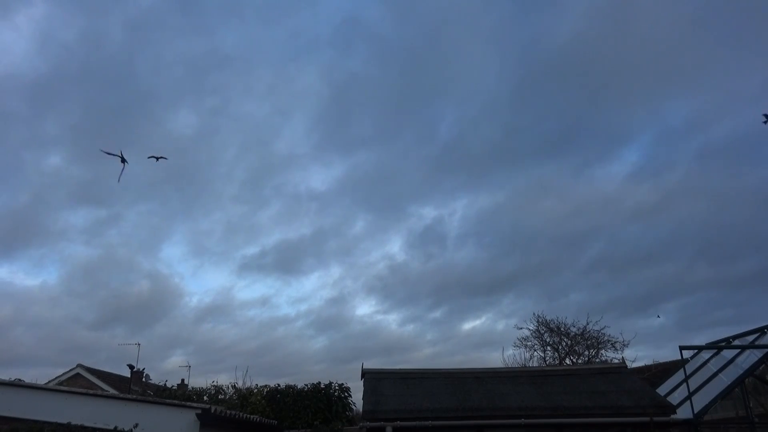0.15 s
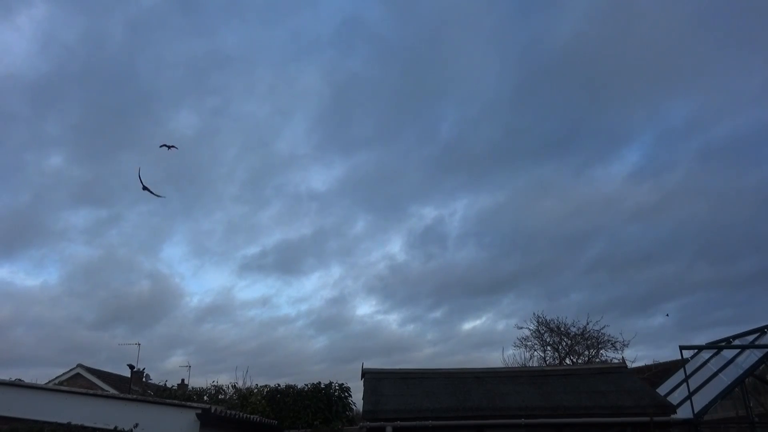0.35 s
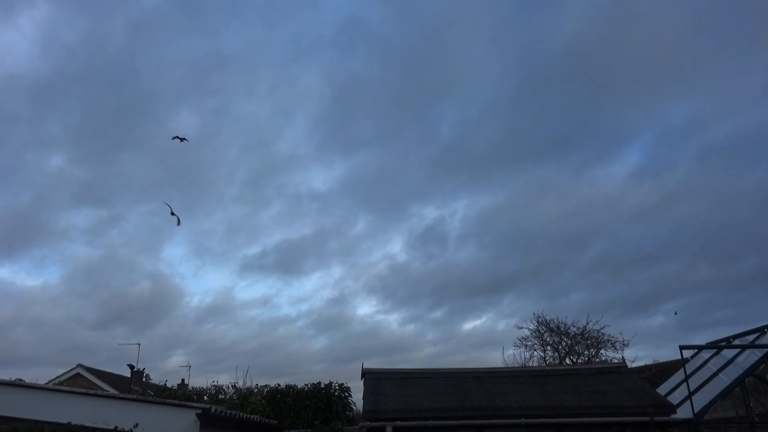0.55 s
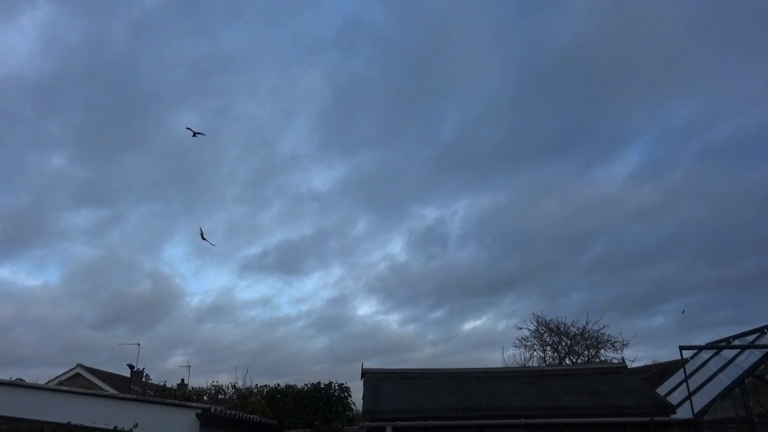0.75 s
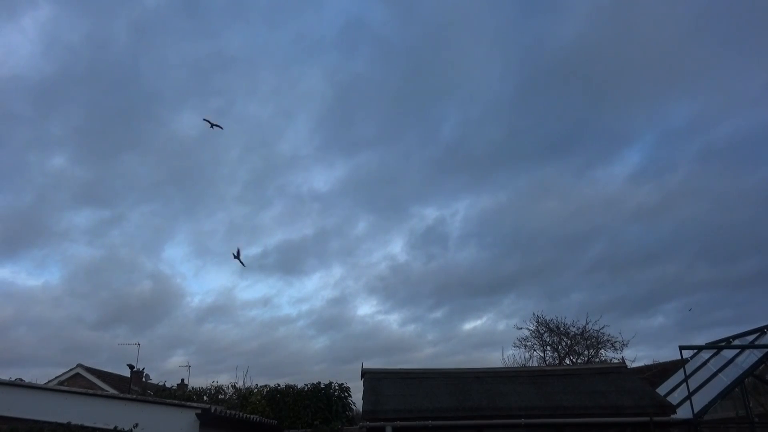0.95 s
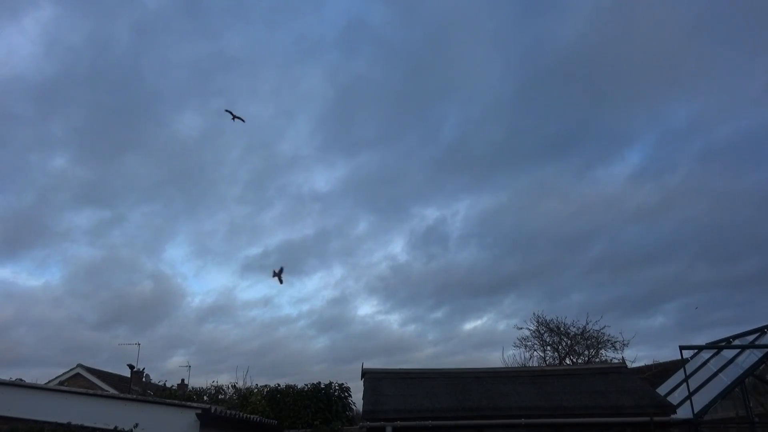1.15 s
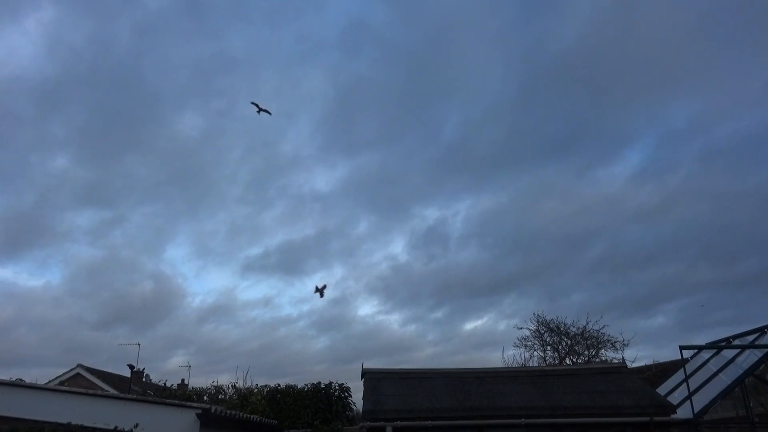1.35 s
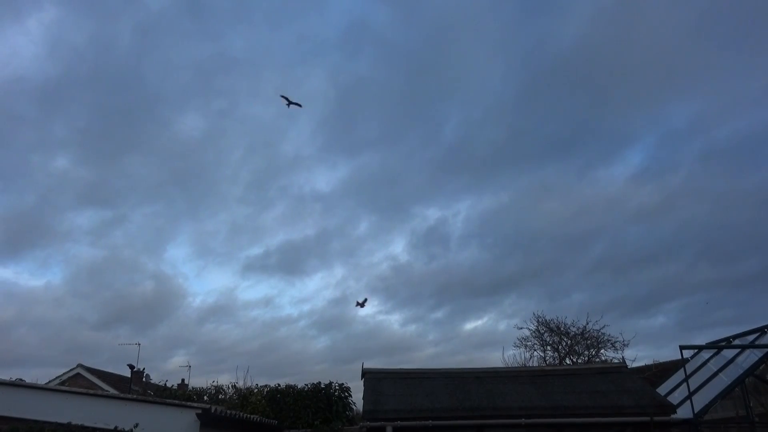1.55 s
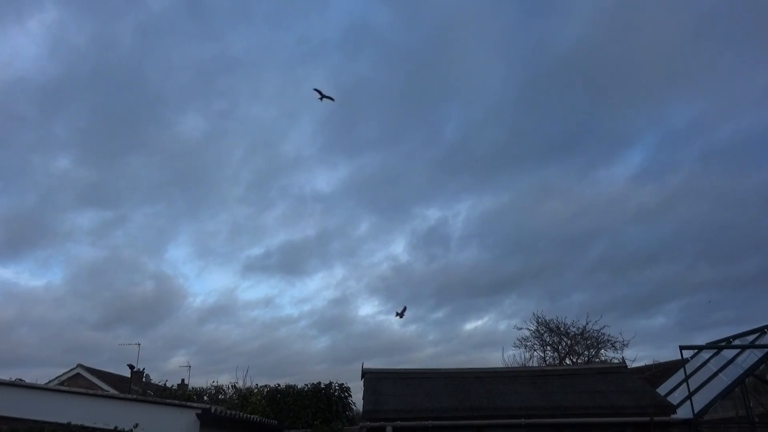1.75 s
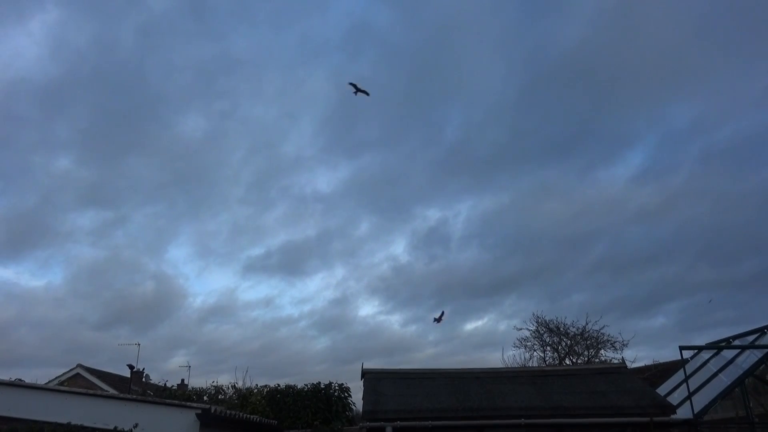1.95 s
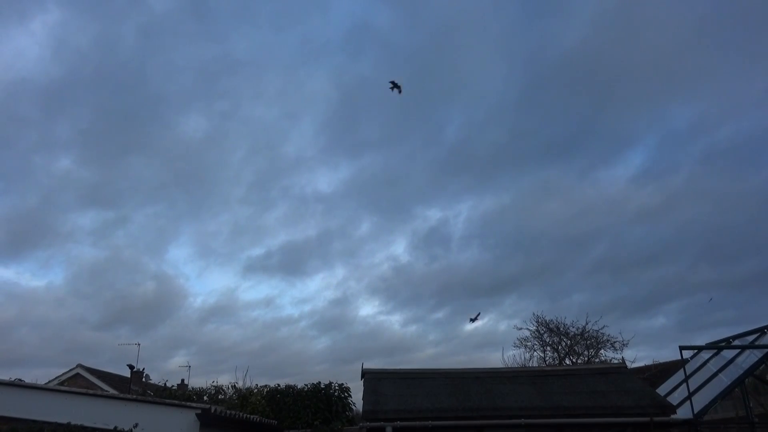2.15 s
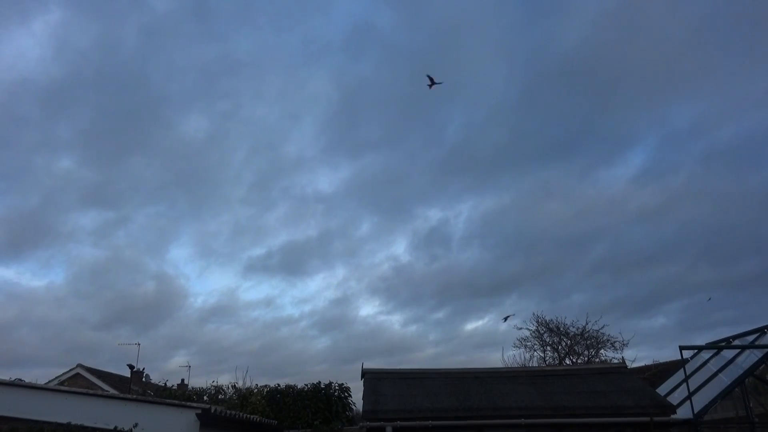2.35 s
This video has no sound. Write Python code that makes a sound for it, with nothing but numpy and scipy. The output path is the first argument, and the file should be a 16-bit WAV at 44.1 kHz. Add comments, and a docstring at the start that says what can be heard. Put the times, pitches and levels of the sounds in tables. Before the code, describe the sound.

Bird of prey whistles, long and thin, then slurs quickly up and down amid buffeting wind.

```python
"""A distant road hums and hisses softly, then a kite calls over gardens: a long thin whistle that breaks upward,
followed by quick rising and falling slurs. The voice is a wavering sine plus its octave, flipping between
a low, slightly reedy register and a pure high one; houses and gardens send back a faint echo.
Faint bird chips and short rustles are gliding raspy bands. Wind buffets the microphone as deep noise on gust curves."""
import sys
import numpy as np
from scipy import signal
from scipy.fft import rfft, irfft, next_fast_len
from scipy.io import wavfile
from scipy.ndimage import uniform_filter1d, map_coordinates

SR = 44100
rng = np.random.default_rng(int(sys.argv[2]) if len(sys.argv) > 2 else 0)


def file_out(sig):
    """Save sig as 16-bit WAV at sys.argv[1]."""
    # one column per channel
    cols = np.atleast_2d(sig).T
    # limit, then scale
    lim = np.clip(cols, -1, 1)
    pcm = np.round(lim * 32767).astype(np.int16)
    wavfile.write(sys.argv[1], SR, pcm)


N = 105840  # samples, 2.4 s

# Kite, one list per note in each register: t/s, pitch f/Hz, level before trim and flutter/dB
LOW_NOTES = [
    [(.2, 2310, -81), (.216, 2446, -66), (.264, 2706, -61.5), (.285, 2850, -68)],
    [(.332, 2856, -64), (.35, 2675, -60), (.43, 2520, -59.5), (.5, 2512, -65), (.595, 2408, -67.5),
     (.64, 2410, -72), (.725, 2485, -62.5), (.748, 2455, -58), (.778, 2465, -59), (.793, 2630, -64)],
    [(1.655, 2260, -73), (1.685, 2150, -71), (1.715, 2320, -76.5)],
    [(1.945, 2528, -71), (1.958, 2380, -64.5), (1.985, 2240, -72), (2.03, 2340, -66.5), (2.05, 2750, -58)],
    [(2.248, 2580, -69), (2.26, 2493, -58.5), (2.283, 2255, -64), (2.3, 2640, -67), (2.316, 2440, -63.5),
     (2.338, 2660, -66), (2.352, 2930, -67)],
    [(2.36, 2440, -64), (2.385, 2310, -73)],
]
HIGH_NOTES = [
    [(.28, 3130, -75), (.305, 3050, -76), (.332, 2990, -63)],
    [(.793, 2805, -62.5), (.85, 2826, -58.5), (.885, 2853, -61), (.915, 2833, -63.5), (1.05, 2843, -66.5),
     (1.085, 2905, -69.5), (1.125, 2913, -67.5), (1.15, 2890, -96), (1.185, 2940, -69), (1.28, 2924, -73),
     (1.42, 2993, -72.5), (1.59, 2980, -80), (1.645, 2860, -67.5)],
    [(1.738, 2930, -75), (1.762, 3120, -68), (1.787, 3266, -69), (1.83, 3226, -63), (1.89, 3100, -72),
     (1.95, 2930, -69), (1.97, 2860, -64.5)],
    [(2.049, 3120, -60), (2.095, 3334, -52.5), (2.118, 3380, -52), (2.148, 3310, -51), (2.21, 3193, -60.5),
     (2.24, 3104, -70)],
]
# Second harmonic: its own f/Hz, level in a full slur relative to the whistle/dB
OCTAVE = [(4300, -17), (4900, -17.5), (5200, -22.5), (5600, -33), (7000, -33)]
# House reflections: delay t/s, level/dB
WALL_ECHOES = [(.035, -26), (0.072, -24), (.135, -27)]
# Garden echo decay: f/Hz, time to fall 60 dB t/s
GARDEN_DECAY = [(500, 0.53), (3000, 0.61), (8000, 0.33)]
# Faint bird chips and short rustles: onset t/s, length t/s, start f/Hz, end f/Hz, rasp rate f/Hz, direct level/dB
CHIPS_AND_RUSTLES = [(0.38, 0.079, 3730, 4740, 1590, -78), (.44, 0.018, 4130, 4540, 1006, -67),
                     (1.283, .045, 3210, 3690, 300, -74.5), (1.705, 0.027, 3600, 4820, 1600, -69),
                     (1.728, .05, 3310, 4630, 2550, -70), (1.747, 0.037, 5020, 5400, 1005, -69.5),
                     (1.761, 0.021, 6000, 6800, 3000, -76.5)]
# Gust curves of the deep rumble and of the upper-bass buffeting: t/s, level before trim/dB
RUMBLE_CURVE = [(0.0, -73), (0.13, -59), (0.16, -49.5), (0.44, -53), (0.65, -41), (0.68, -46), (0.76, -44),
                (0.83, -54), (0.87, -52), (1.2, -55), (1.26, -41), (1.34, -50.5), (1.41, -36.5),
                (1.54, -39), (1.62, -46), (1.68, -38.5), (1.75, -53), (1.86, -47), (2.12, -64), (2.4, -66)]
BUFFET_CURVE = [(0.0, -65), (0.1, -80), (0.17, -54.5), (0.25, -69), (0.41, -54.5), (0.63, -55),
                (0.71, -50.5), (0.75, -58), (0.94, -68), (0.98, -55.5), (1.21, -64), (1.31, -53),
                (1.36, -54.5), (1.4, -43.5), (1.46, -47), (1.56, -41), (1.59, -51), (1.66, -40.5),
                (1.7, -58), (1.88, -42), (1.96, -67), (2.4, -71)]  # its swings are widened before use
# Noise colours before levelling: f/Hz, relative level per Hz/dB
RUMBLE_COLOUR = [(8, -1), (16, 2.5), (28, 2.5), (45, -3.5), (75, -9.5), (125, -24.5), (250, -39),
                 (600, -65), (2000, -120)]
BUFFET_COLOUR = [(20, -6.5), (45, 1), (80, 1), (110, -3), (180, -7), (300, -16.5), (500, -26), (1000, -53),
                 (3000, -93)]
ROAD_COLOUR = [(30, 9.5), (100, -10), (250, -7), (400, -4), (600, -2.5), (800, 0.5), (940, 3.5),
               (1030, 1.5), (1150, -4.5), (1400, -8), (1650, -8), (2100, -14), (3000, -22), (4000, -36.5),
               (6000, -45.5), (12000, -77)]
HISS_COLOUR = [(500, -10.5), (3500, 3.5), (7000, -0.5), (10000, -1), (14000, -0.5), (16000, -1)]
# Stereo likeness of the road: f/Hz, left-right correlation (1 = identical)
ROAD_ALIKE = [(60, 0.6), (250, 0.67), (500, 0.79), (1000, 0.83), (2000, 0.67), (5000, 0.17)]

# Stereo offsets are left minus right, so a negative value leans right
KITE_DB, KITE_PAN_DB = -0.5, -6.5
EDGE_S = 0.006  # fade in and out, centred on the note's ends
JITTER, SLUR_JITTER = 0.0024, 0.0019  # pitch scatter as a fraction: always, and added in full slurs
FLUTTER_DB, SLUR_FLUTTER_DB = 1.1, 1.1  # level scatter: always, and added in full slurs
SLUR_HZ_PER_S = 4900  # glide speed that counts as a full slur
HELD_OCTAVE_CUT_DB = 20  # a held note's octave is this much weaker than a slur's
WEAK_DB, WEAK_FLUTTER_DB = -65.5, 0.1631  # below this level, extra flutter for each dB less
GARDEN_KITE_DB, GARDEN_FAINT_DB = -9.5, -2.5  # garden echo relative to kite, and to chips and rustles
RUMBLE_DB, BUFFET_DB = 1.5, 1.5  # trims
BUFFET_STRETCH = 1.28  # widens the gusts' dB range below their peak
ROAD_DB, ROAD_PAN_DB, HISS_DB = -52.5, -1.7, -70.5
TOP_HZ = 15750


def kite():
    """Call that flips between registers: every low and high note summed on one timeline."""
    return amp(KITE_DB) * sum(whistle(note) for note in LOW_NOTES + HIGH_NOTES)


def whistle(note):
    """One unsteady sine with its octave; fast slurs are reedier and rougher, weak notes fray."""
    t = np.arange(N) / SR
    hz, db = curves(note)
    hz = uniform_filter1d(hz, size=300)  # rounds the pitch corners
    slur = np.clip(np.abs(np.gradient(hz)) * SR / SLUR_HZ_PER_S, 0, 1)  # 0 held, 1 full slur

    jitter = (JITTER + SLUR_JITTER * slur) * wobble(160)
    phase = 2 * np.pi * np.cumsum(hz * (1 + jitter)) / SR
    octave_db = along(OCTAVE, 2 * hz) + HELD_OCTAVE_CUT_DB * (slur - 1)
    tone = np.sin(phase) + amp(octave_db) * np.sin(2 * phase)

    fray_db = SLUR_FLUTTER_DB * slur + WEAK_FLUTTER_DB * np.maximum(WEAK_DB - db, 0)
    flutter_db = FLUTTER_DB * wobble(70) + fray_db * wobble(130)

    to_nearest_end = np.minimum(t - note[0][0], note[-1][0] - t)
    gate = np.clip(to_nearest_end / EDGE_S + 0.5, 0, 1)
    fade = np.sin(gate * np.pi / 2) ** 2
    return np.sqrt(2) * fade * amp(db + flutter_db) * tone  # sqrt(2): sine to rms 1


def walls(x):
    """House walls return a few distinct delayed copies, made as phase shifts in the spectrum."""
    def reflections(hz):
        return sum(amp(db) * np.exp(-2j * np.pi * hz * s) for s, db in WALL_ECHOES)
    return filtered(x, reflections)


def gardens(x):
    """Roofs, fences and trees scatter a diffuse echo: a stereo noise tail decaying band by band."""
    hz, t, bands = signal.stft(rng.standard_normal((2, SR)), SR, nperseg=256)
    decay = amp(-60 * t / along(GARDEN_DECAY, hz)[:, None])
    tail = signal.istft(bands * decay, SR, nperseg=256)[1]
    tail = tail / np.linalg.norm(tail[0])
    return signal.fftconvolve(x[None], tail, axes=1)[:, :N]


def chips_and_rustles():
    """Faint bird chips and short rustles: two random envelopes spread a gliding carrier into a band."""
    t, out = np.arange(N) / SR, np.zeros(N)
    for onset, length, start_hz, end_hz, rasp_hz, db in CHIPS_AND_RUSTLES:
        progress = np.clip((t - onset) / length, 0, 1)
        hz = start_hz + (end_hz - start_hz) * progress
        phase = 2 * np.pi * np.cumsum(hz) / SR
        rasp = wobble(rasp_hz) * np.sin(phase) + wobble(rasp_hz) * np.cos(phase)
        out += amp(db) * np.sin(np.pi * progress) * unit(rasp)
    return out


def wind():
    """Gusts on the microphone: deep rumble and upper-bass buffeting, each noise on its own curve."""
    rumble_db, = curves(RUMBLE_CURVE)
    buffet_db, = curves(BUFFET_CURVE)
    peak_db = buffet_db.max()
    buffet_db = peak_db + BUFFET_STRETCH * (buffet_db - peak_db)
    rumble = amp(rumble_db + RUMBLE_DB) * rush(RUMBLE_COLOUR, [(50, 0.94)]) * pan(db=-2.5)
    buffet = amp(buffet_db + BUFFET_DB) * rush(BUFFET_COLOUR, [(150, 0.86)]) * pan(db=-6)
    return rumble + buffet


def road():
    """Tyre noise of a distant road: coloured noise, almost steady in level."""
    return amp(ROAD_DB + 0.2 * wobble(4.14)) * rush(ROAD_COLOUR, ROAD_ALIKE) * pan(ROAD_PAN_DB)


def hiss():
    """The microphone's own hiss: steady noise, nearly unrelated left to right."""
    return amp(HISS_DB) * rush(HISS_COLOUR, [(5000, 0.056)])


def rush(colour, alike):
    """Coloured stereo noise of rms 1; the mid-to-side balance sets the left-right likeness."""
    def mid_side(hz):
        turn = np.arccos(np.clip(along(alike, hz), -1, 1)) / 2
        return amp(along(colour, hz)) * np.array([np.cos(turn), np.sin(turn)])
    mid, side = filtered(rng.standard_normal((2, N)), mid_side)
    return unit(np.array([mid + side, mid - side]))


def filtered(x, response):
    """Shapes x by a response of frequency, zero-padded so echoes do not wrap round."""
    size = next_fast_len(N + SR // 2)
    hz = np.fft.rfftfreq(size, 1 / SR)
    return irfft(rfft(x, size) * response(hz), size)[..., :N]


def wobble(rate):
    """A smooth random curve through `rate` random points a second."""
    points = rng.standard_normal(int(N * rate / SR) + 4)
    return map_coordinates(points, [np.arange(N) * rate / SR])


def curves(rows):
    """One value per sample for each column after the time."""
    s, *columns = np.transpose(rows)
    return [np.interp(np.arange(N) / SR, s, column) for column in columns]


def along(points, hz):
    """Reads (Hz, value) points on a log frequency axis."""
    f, values = np.transpose(points)
    return np.interp(np.log(hz + 1), np.log(f + 1), values)


def pan(db):
    """Left and right gains for a left-minus-right level difference."""
    return amp(np.array([[db], [-db]]) / 2)


def unit(x):
    """Scales to rms 1."""
    return x / np.sqrt(np.mean(x ** 2) + 1e-20)


def amp(db):
    """Decibels to gain."""
    return 10 ** (np.asarray(db) / 20)


def scene():
    """The kite, and faint chips and rustles, with their echoes, over wind, road and hiss."""
    call, faint = kite(), chips_and_rustles()
    kite_heard = call * pan(KITE_PAN_DB) + walls(call) + amp(GARDEN_KITE_DB) * gardens(call)
    faint_heard = faint + amp(GARDEN_FAINT_DB) * gardens(faint)
    return kite_heard + faint_heard + wind() + road() + hiss()


def record(dry):
    """Band limit: nothing at or above TOP_HZ is kept."""
    return filtered(dry, lambda hz: hz < TOP_HZ)


dry = scene()
out = record(dry)
file_out(out)
```